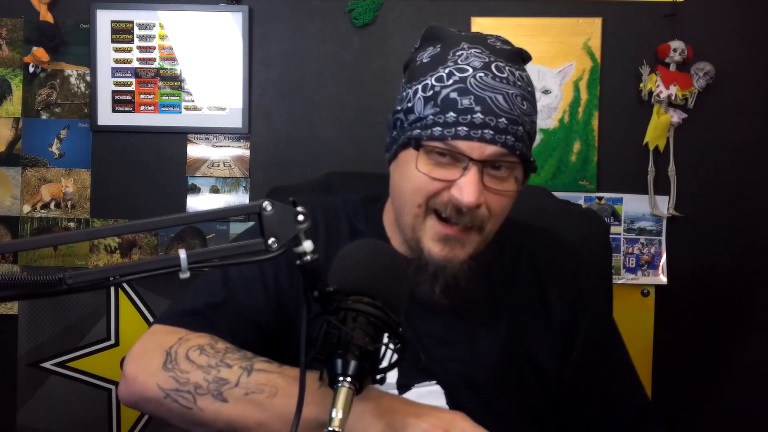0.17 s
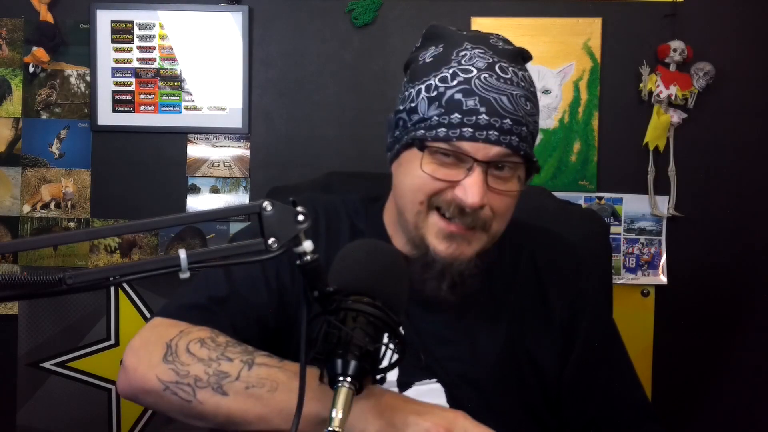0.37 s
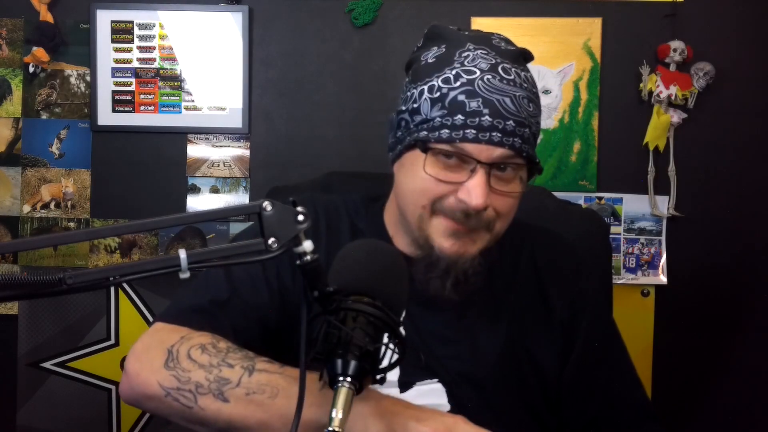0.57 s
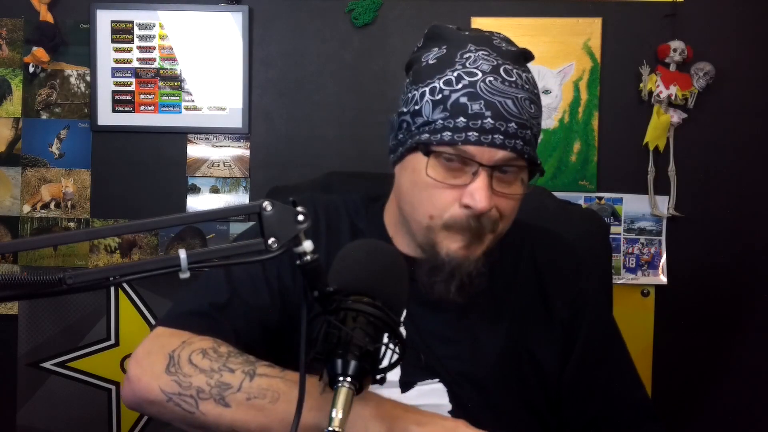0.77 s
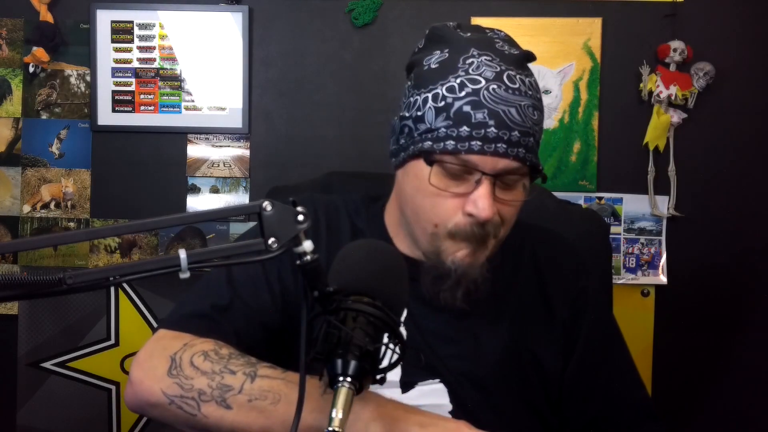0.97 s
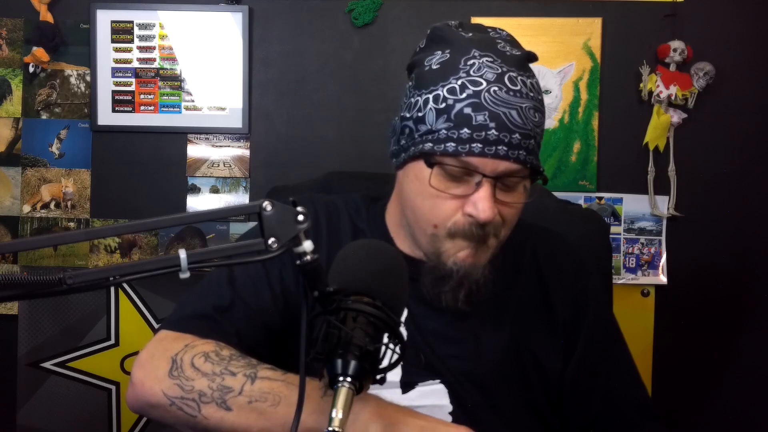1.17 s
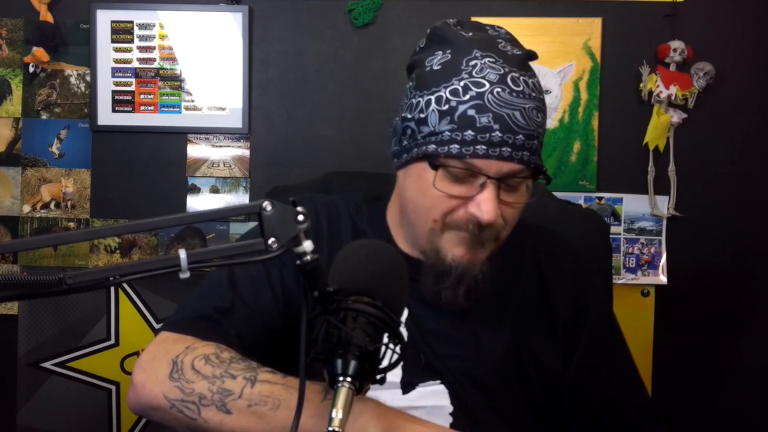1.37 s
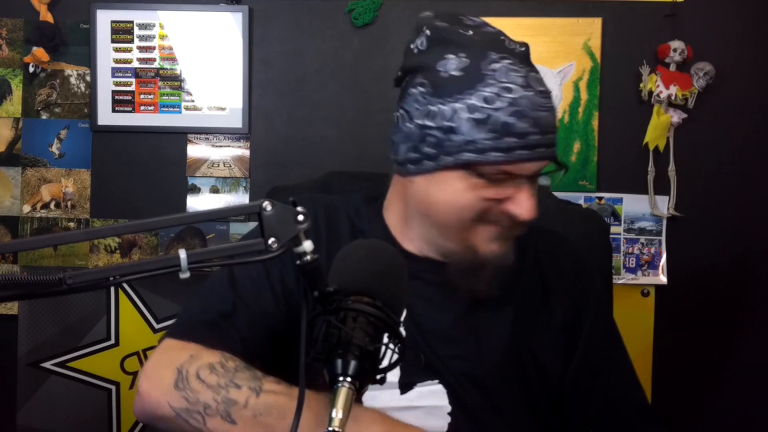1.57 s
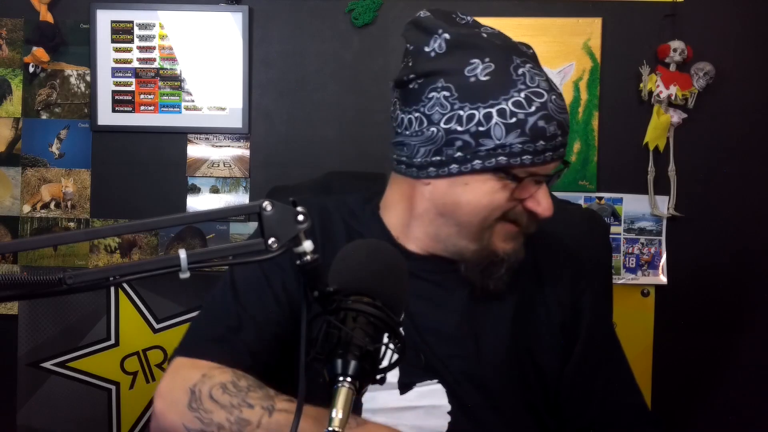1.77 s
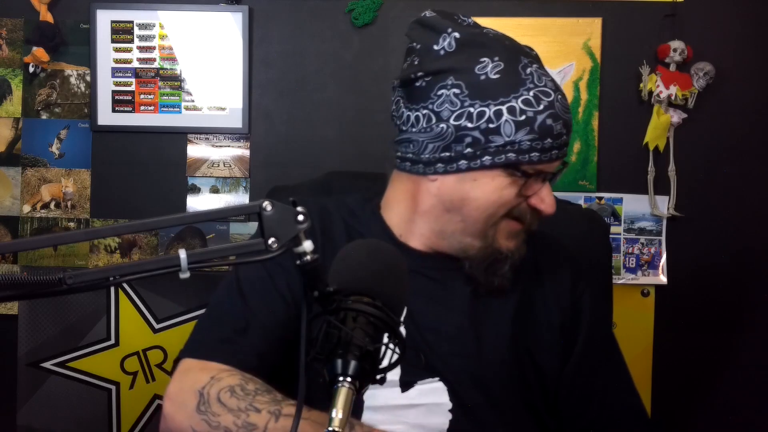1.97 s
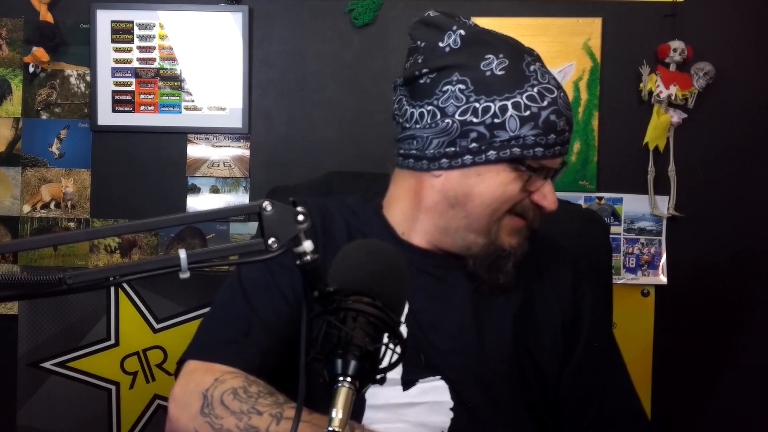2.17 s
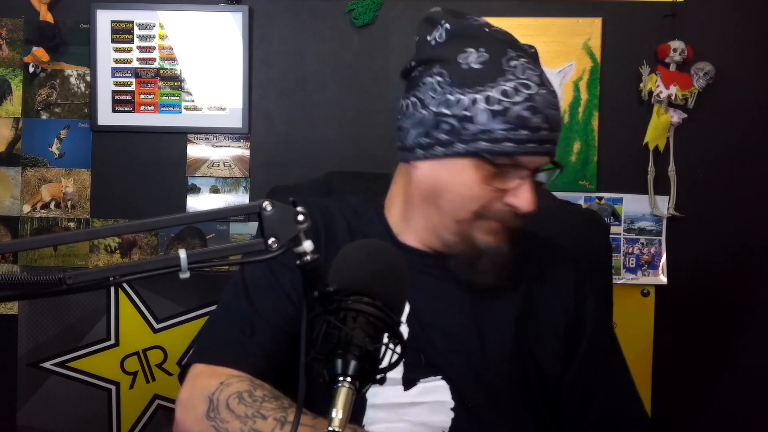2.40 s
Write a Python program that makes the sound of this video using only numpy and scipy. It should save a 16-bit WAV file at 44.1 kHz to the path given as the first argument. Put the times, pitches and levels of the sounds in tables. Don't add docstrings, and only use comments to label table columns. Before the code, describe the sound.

Two sharp, rattling tab clicks on a metal drink can, a quiet stretch with tiny creaks and low desk rumble, then a sudden fizzy crack at the very end, slightly off a close stereo microphone indoors.

```python
import sys
import numpy as np
from scipy import signal
from scipy.fft import rfft, irfft, next_fast_len
from scipy.io import wavfile
from scipy.ndimage import uniform_filter1d

SR = 44100
rng = np.random.default_rng(int(sys.argv[2]) if len(sys.argv) > 2 else 0)


def level_to_linear(level):
    exponent = np.asarray(level, float) / 20
    return 10 ** exponent


def unload_wav(signal):
    wavfile.write(
        sys.argv[1],
        SR,
        np.round(np.clip(np.atleast_2d(signal).T, -1, 1) * 32767).astype(np.int16),
    )


N = 107427
TIME = np.arange(N) / SR


def since(s):
    return np.clip(TIME - s, 0, None)


def unit(x):
    return x / np.sqrt(np.mean(x ** 2) + 1e-20)


def along(points, hz):
    f, v = np.transpose(points)
    return np.interp(np.log(hz + 1), np.log(f + 1), v)


def curves(rows):
    s, *columns = np.transpose(rows)
    return [np.interp(TIME, s, column) for column in columns]


def filtered(x, response):
    m = next_fast_len(N + SR // 2)
    return irfft(rfft(x, m) * response(np.fft.rfftfreq(m, 1 / SR)), m)[..., :N]


def above(corner_hz, order):
    return lambda hz: 1 / (1 + (corner_hz / (hz + 1)) ** order)


def resonances(peaks):
    def response(f):
        total = 0
        for k, (centre, width, db) in enumerate(peaks):
            push_back = 1j * f * width
            total = total + (-1) ** k * level_to_linear(db) * push_back / (centre * centre - f * f + push_back)
        return total
    return response


def causal(spectrum):
    cepstrum = irfft(np.log(level_to_linear(along(spectrum, np.fft.rfftfreq(2048, 1 / SR))) + 1e-5))
    cepstrum[1:1024] *= 2
    cepstrum[1025:] = 0
    return unit(irfft(np.exp(rfft(cepstrum)))[:1024]) / 32


def coloured(x, spectrum):
    return signal.fftconvolve(x, causal(spectrum)[None], axes=1)[:, :N]


def crackle(per_s, spread_db):
    chance, size, sign = rng.random((3, N))
    height = level_to_linear(-spread_db * np.log(size + 0.0011))
    return unit((chance < per_s / SR) * height * np.sign(sign - .5))


def blend(a, b, alike):
    turn = np.arccos(np.clip(alike, -1, 1)) / 2
    return np.array([np.cos(turn) * a + np.sin(turn) * b, np.cos(turn) * a - np.sin(turn) * b])


def wander():
    return np.interp(TIME * 25, np.arange(80), rng.standard_normal(80))


def hum(hz, width, order):
    noise = filtered(rng.standard_normal(N), lambda f: resonances([(hz, width, 0)])(f) ** order)
    return np.sqrt(2) * np.sin(2 * np.pi * hz * TIME) + .5 * unit(noise)


# (frequency [Hz], t60 [s])
ROOM = [(300, 0.12), (2000, 0.43), (8000, 0.24), (15000, 0.11)]
ROOM_ALIKE, LAG_S = 0.36, 4e-5


def room(x, pan_db, wet_db):
    hz, t, z = signal.stft(rng.standard_normal((2, SR // 2)), SR, nperseg=256)
    fading = z * level_to_linear(-60 * t / along(ROOM, hz)[:, None])
    tail = blend(*signal.istft(fading, SR, nperseg=256)[1], ROOM_ALIKE)
    late = np.pad(x, ((0, 0), (200, 0)))[:1]
    wet = signal.fftconvolve(late, tail / np.linalg.norm(tail[0]), axes=1)[:, :N]
    direct = filtered(x, lambda f: np.exp(-2j * np.pi * f * LAG_S * np.array([[0], [1]])))
    return (direct + level_to_linear(wet_db) * wet) * level_to_linear([[pan_db], [-pan_db]])


# (time [s], peak level [dB], chatter length [s], t60 [s])
SNAPS = [
    (0.1069, -12, 0.046, 0.24),
    (0.4493, -12.5, 0.041, 0.23),
]
# (frequency [Hz], level [dB per Hz])
SNAP_COLOURS = [
    [(400, -37.5), (1800, -12), (2450, -22.5), (3600, -3.5), (5300, -12), (6000, -14), (11000, -11),
     (16000, -31.5)],
    [(450, -30), (700, -17.5), (2100, -12.5), (2700, -16), (6500, -6.5), (9400, -2.5), (12000, -6),
     (16000, -32)],
]
# (frequency [Hz], width [Hz], level [dB])
WALLS = [
    [(1780, 440, -8.5), (5060, 220, 1.5), (8360, 150, 3), (9670, 200, -1), (10600, 260, -2.5)],
    [(2130, 430, 1), (3440, 490, 0.5), (5190, 400, -6.5), (7300, 360, -5.5), (8600, 270, -4.5),
     (9380, 290, -1.5)],
]
# (frequency [Hz], level [dB], t60 [s])
LID = [(2875, -11, .3), (2939, -5, .36), (3426, -9, .25), (3452, -6, .26), (3479, -2, .3), (3517, -2, .3),
       (3570, -8, .25), (3675, -10, .3), (4250, -12, .2), (4689, -12, .24), (5206, -10, .2)]
# first-slap level [dB], chatter swell time [s], lid ring level [dB]
SLAP_DB = [7.5, 4]
SWELL_S = [0.00087, 0.0037]
LID_DB = [-6.5, -40]
PAN_DB = [0.5, 0, -0.5]
CHATTER_PER_S, CHATTER_SPREAD_DB, CHATTER_DB, SIZZLE_DB = 3000, 3, -12.5, -8.5
SNAP_ALIKE, SNAP_WET_DB, LID_WET_DB = 0.38, -9, -11
LID_WANDER = 1.1
DAMP_S, DAMP_DB = .215, 7


def snaps():
    out = np.zeros((2, N))
    rows = zip(SNAPS, SNAP_COLOURS, WALLS, SLAP_DB, SWELL_S, LID_DB, PAN_DB)
    for (s, db, hold, t60), colour, walls, slap_db, swell, lid_db, pan_db in rows:
        t = since(s)
        slap = (t > 0) * level_to_linear(slap_db - 60 * t / 0.023) * rng.standard_normal(N)
        shape = (1 - np.exp(-t / swell)) * level_to_linear(-60 * np.clip(t - hold, 0, None) / t60)
        chatter = []
        for _ in "LR":
            rattle = level_to_linear(CHATTER_DB) * crackle(CHATTER_PER_S, CHATTER_SPREAD_DB)
            chatter.append(rattle + level_to_linear(SIZZLE_DB) * rng.standard_normal(N))
        force = slap + shape * blend(*chatter, SNAP_ALIKE)
        force = filtered(force, lambda f: 0.85 + sum(resonances([w])(f) for w in walls))
        out += room(level_to_linear(db) * coloured(force, colour), pan_db, SNAP_WET_DB)

        ring = np.zeros((2, N))
        for hz, level, life in LID:
            ear_phase = [[0], [rng.normal(0, 0.53)]]
            tone = np.sin(2 * np.pi * hz * t + LID_WANDER * wander() + ear_phase)
            ring += level_to_linear(level - 60 * t / life) * tone * (1 - np.exp(-t / 0.0005))
        damped_db = DAMP_DB * np.clip((t + s - DAMP_S) / 0.012, 0, 1)
        out += room(level_to_linear(db + lid_db - damped_db) * ring, pan_db, LID_WET_DB)
    return out


# (frequency [Hz], level [dB per Hz])
SPIT = [(1500, -12.5), (4200, -2.5), (5200, -5.5), (6300, 0), (7100, -3), (10000, 5.5), (14500, -24)]


def ping(s, db, hz, spit_db, t60, rise=0.00032):
    t = since(s)
    spit = coloured(rng.standard_normal((2, N)), SPIT)
    envelope = level_to_linear(db - 60 * t / t60) * (1 - np.exp(-t / rise))
    return envelope * (np.sin(2 * np.pi * hz * t) + level_to_linear(spit_db) * spit)


# (time [s], flow level [dB], brightness [dB])
GAS = [
    (2.3275, -50, -8),
    (2.3295, -10.5, 2),
    (2.34, -10, -0.5),
    (2.372, -12.5, -1.5),
    (2.4, -16, 5),
    (2.412, -17.5, -9),
    (2.436, -24, 10),
]
# (frequency [Hz], level [dB per Hz])
JET = [(59, -51), (100, -11), (285, -10.5), (2200, -10), (3300, -3), (4580, -11.5), (8150, -6),
       (15500, -17.5), (16500, -42)]
# (frequency [Hz], width [Hz], level [dB])
MOUTH = [(3200, 820, 1.5), (8350, 230, 8.5), (9800, 220, 0), (10650, 380, 3)]
# (time [s], level [dB], pitch [Hz])
RIPS = [(2.34, -12, 8850), (2.3397, -8, 11080), (2.4013, -14.5, 9800), (2.404, -12, 9460),
        (2.4074, -12, 9100), (2.414, -16, 10100), (2.429, -16, 10400)]
# (frequency [Hz], width [Hz], level [dB])
WHISTLE = [(9980, 200, 4), (3200, 530, -8)]
MOUTH_DB, TEAR_DB, TEAR_PER_S, JET_ALIKE = -3, -4, 1300, 0.095
RIP_T60_S, RIP_SPIT_DB = .012, -1.6
WHISTLE_S, WHISTLE_LENGTH_S, WHISTLE_DB = 2.365, .04, -27


def opening():
    flow_db, bright_db = curves(GAS)
    tearing = [rng.standard_normal(N) + level_to_linear(TEAR_DB) * crackle(TEAR_PER_S, 2.4) for _ in "LR"]
    force = blend(*tearing, JET_ALIKE)
    jet = unit(filtered(force, lambda hz: level_to_linear(along(JET, hz))))
    jet = jet + level_to_linear(MOUTH_DB) * unit(filtered(force, resonances(MOUTH)))
    high = filtered(jet, above(6500, 6))
    jet = jet + (level_to_linear(bright_db) - 1) * high
    jet = (TIME > GAS[0][0]) * level_to_linear(flow_db - 4.0) * jet
    rips = sum(ping(*row, RIP_SPIT_DB, RIP_T60_S) for row in RIPS) * [[1], [-1]]
    whistle = unit(filtered(rng.standard_normal(N), lambda f: resonances(WHISTLE)(f) ** 2))
    swell = (TIME > GAS[1][0]) * np.exp(-((TIME - WHISTLE_S) / WHISTLE_LENGTH_S) ** 4)
    whistle = level_to_linear(WHISTLE_DB) * swell * whistle * [[1], [-1]]
    return room(jet + rips, -0.15, -10) + whistle


# (time [s], peak level [dB], pitch [Hz], spit level [dB])
TICKS = [(0.6505, -36, 9300, 1), (0.66, -29.5, 9700, 8), (0.6683, -36.5, 10300, 5.5),
         (0.7315, -35, 9440, 8.5), (0.764, -39.5, 8800, 6), (0.7719, -39, 8800, 4), (1.3968, -27, 9420, -6),
         (1.6514, -19.5, 5300, -6), (1.7795, -13.5, 9280, -1), (1.79, -35, 9680, -10),
         (2.2845, -18.5, 10500, -8), (2.2994, -53, 10300, -10)]
# (frequency [Hz], width [Hz], level [dB])
SCUFF = [(760, 250, 1.5), (4100, 1000, -4.5), (5840, 1300, -1), (8500, 1500, -15), (10100, 1300, -6)]
SCUFF_S, SCUFF_LENGTH_S, SCUFF_DB = 0.697, 0.046, -48
TICK_T60_S, SCRAPE_T60_S, SCRAPE_RISE_S = .0028, .016, .001
RIM_HZ = 7000


def ticks():
    def creak(rows, wet_db, *timing):
        return room(sum(ping(*row, *timing) for row in rows), PAN_DB[2], wet_db)

    scuff = unit(filtered(rng.standard_normal((2, N)), lambda f: resonances(SCUFF)(f) ** 2))
    scuff = level_to_linear(SCUFF_DB) * scuff * np.exp(-((TIME - SCUFF_S) / SCUFF_LENGTH_S) ** 2)
    scrapes = creak(TICKS[:3], -2, SCRAPE_T60_S, SCRAPE_RISE_S)
    scrapes = scrapes + creak(TICKS[3:6], -2, SCRAPE_T60_S, SCRAPE_RISE_S)
    wall = creak(TICKS[6:8], -11, TICK_T60_S)
    rim = creak(TICKS[8:], -6, TICK_T60_S)
    return scuff + scrapes + wall + filtered(rim, above(RIM_HZ, 10))


PUSH_S, PUSH_RISE_S, PUSH_HZ, PUSH_DB = 2.327, 0.003, 4.5, -19.5
PUSH_GROWS = 6.9


def push():
    t = since(PUSH_S)
    size = level_to_linear(PUSH_DB) * (1 - np.exp(-t / PUSH_RISE_S)) * np.exp(PUSH_GROWS * t)
    return -size * np.cos(2 * np.pi * PUSH_HZ * t)


# (frequency [Hz], level [dB per Hz])
RUMBLE = [(25, -24), (42, 0.5), (52, -5), (65, -14), (173, -17), (214, -37), (300, -34), (390, -47),
          (660, -120)]
RUMBLE_DB = -43
# (frequency [Hz], level [dB per Hz])
HISS = [(150, -13), (200, -5), (300, -14.5), (600, -17.5), (900, -16.5), (3900, -25.5), (15300, -26.5),
        (16200, -47)]
HISS_DB = -49
# (frequency [Hz], likeness [-1 to 1])
ALIKE = [(60, 0.89), (180, 0.94), (550, 0.72), (1650, 0.55), (4970, 0.26), (15000, 0.51)]


def pair(spectrum):
    def split(hz):
        turn = np.arccos(np.clip(along(ALIKE, hz), -1, 1)) / 2
        return level_to_linear(along(spectrum, hz)) * [np.cos(turn), np.sin(turn)]
    mid, side = filtered(rng.standard_normal((2, N)), split)
    return unit(np.array([mid + side, mid - side]))


# (time [s], frequency [Hz], level [dB])
SWAY = [(0.0, 34.8, -37), (0.03, 35.7, -60), (0.08, 36.3, -40), (0.12, 34.2, -57), (0.24, 32.96, -33),
        (0.49, 32.8, -39), (0.79, 32.8, -34.5), (0.87, 33.2, -49), (0.89, 34, -36), (1.03, 33.33, -42.5),
        (1.16, 33.98, -30), (1.58, 34.48, -36), (1.91, 34.4, -30.5), (2.02, 34.5, -42),
        (2.08, 32.36, -30.5), (2.21, 34.32, -39.5), (2.27, 32, -29), (2.32, 31.55, -40)]
# (time [s], level [dB])
SHAKE = [(0, -31.5), (.09, -30), (.118, -41.5), (.18, -30.5), (.25, -40), (.43, -41.5), (.5, -48.5),
         (.83, -43), (.85, -31), (.9, -26), (.94, -36), (.97, -33), (1.03, -34.5), (1.05, -53),
         (1.1, -38.5), (1.3, -58)]
# (frequency [Hz], width [Hz], level [dB])
ARM = [(51.85, 9.4, 1.5), (75, 10, -7), (102.5, 68, -8), (169, 25, -23.5)]


def arm():
    hz, db = curves(SWAY)
    sway = np.sqrt(2) * level_to_linear(db) * np.sin(2 * np.pi * np.cumsum(hz) / SR)
    shake_db, = curves(SHAKE + [(1.67, -61)])
    shake = sum(level_to_linear(level) * hum(centre, width, 2) for centre, width, level in ARM)
    return sway + level_to_linear(shake_db) * shake + level_to_linear(RUMBLE_DB) * pair(RUMBLE)


DUCK_DB, RECOVER_S = 2.5, 0.35


def hiss():
    duck_db = sum((TIME > s) * DUCK_DB * np.exp(-np.abs(TIME - s) / RECOVER_S) for s, *_ in SNAPS)
    return level_to_linear(HISS_DB - duck_db) * pair(HISS)


# (frequency [Hz], width [Hz], level [dB], middle time [s], length [s])
FAN = [(172.3, 6.1, -51.5, 1.5, 0.21), (175, 8.9, -48, 0.884, 0.076), (247, 7, -57.5, 1.914, 0.32),
       (338, 8, -63.5, 1.39, 0.45), (484, 5.8, -66, 1.39, 0.11)]


def fan():
    out = np.zeros(N)
    for hz, width, db, s, length in FAN:
        out += level_to_linear(db) * np.exp(-((TIME - s) / length) ** 4) * hum(hz, width, 1)
    return out


def scene():
    return snaps() + opening() + ticks() + arm() + hiss() + fan()


def roll_off(x):
    return signal.sosfilt(signal.butter(12, 16810, fs=SR, output="sos"), x)


# (frequency [Hz], level [dB])
PRESENCE = [(7200, 0), (8200, 3.5), (11200, 4), (11900, 1.5), (15700, 5.5), (16100, -18)]
# (start [s], end [s], low edge [Hz], high edge [Hz])
STARVED = [(.15, .225, 14900, 17000), (.225, .25, 15400, 17000), (.15, .178, 13800, 14300),
           (.467, .523, 14900, 17000), (.467, .505, 12900, 13500), (2.34, 2.362, 9200, 10400),
           (2.362, 2.39, 9050, 9650), (2.342, 2.362, 13300, 14800), (2.362, 2.43, 13350, 14000),
           (2.345, 2.37, 4350, 4700), (2.335, 2.44, 15950, 17000)]
# (start [s], end [s], low edge [Hz], high edge [Hz])
STARVED_SIDE = [(2.35, 2.44, 15300, 17000), (2.382, 2.44, 10300, 11100), (2.382, 2.44, 11800, 12600),
                (2.382, 2.41, 14300, 15300), (2.425, 2.44, 11100, 14200)]
CLIP, CLIP_HARD, TOP_HZ = .52, 8, 16800
WIDE_TOP_HZ, WIDE_S = 8300, .016


def record(dry):
    def band(x, start, end, low, high, soft):
        inside = uniform_filter1d(1. * (TIME > start) * (TIME < end), size=soft)
        return filtered(x, lambda hz: (hz > low) & (hz < high)) * inside

    x = dry / (1 + np.abs(dry / CLIP) ** CLIP_HARD) ** (1 / CLIP_HARD)
    x = filtered(x, lambda hz: level_to_linear(along(PRESENCE, hz)) * (hz < TOP_HZ)) + push()
    attacks = [row[0] for row in SNAPS + TICKS[:5] + TICKS[7:9]] + [SCUFF_S]
    wide = TIME > GAS[0][0] - .004
    for s in attacks:
        wide = wide | (np.abs(TIME - s - WIDE_S / 4) < WIDE_S)
    narrow = uniform_filter1d(1. * ~wide, size=200)
    lost_side = filtered((x[0] - x[1]) / 2 * narrow, above(WIDE_TOP_HZ, 80))
    for row in STARVED:
        x = x - band(x.mean(0), *row, 500)
    for row in STARVED_SIDE:
        lost_side = lost_side + band((x[0] - x[1]) / 2, *row, 300)
    return roll_off(x - lost_side * [[1], [-1]])


dry = scene()
out = record(dry)
unload_wav(out)
```